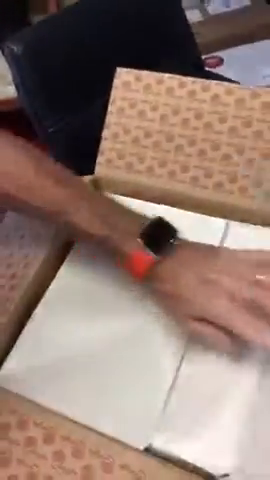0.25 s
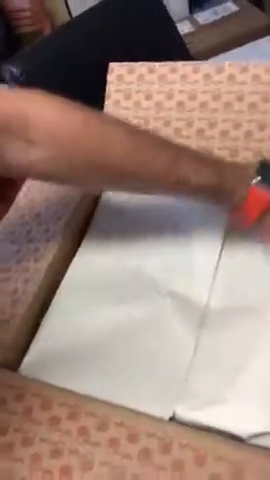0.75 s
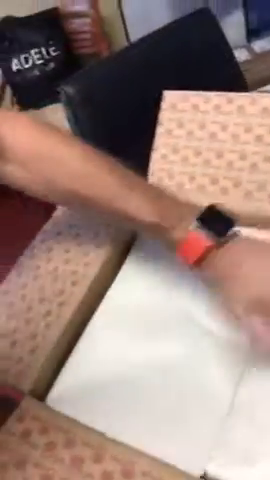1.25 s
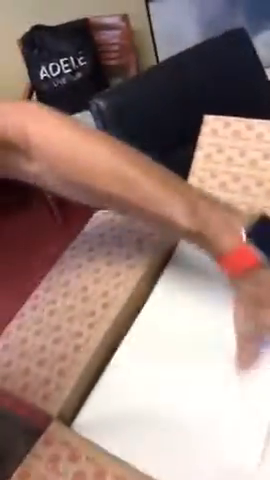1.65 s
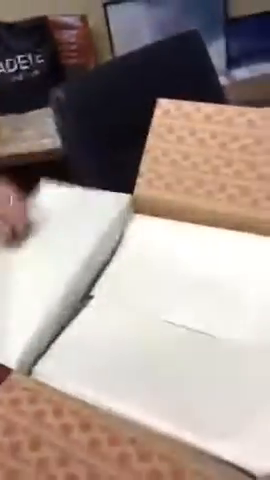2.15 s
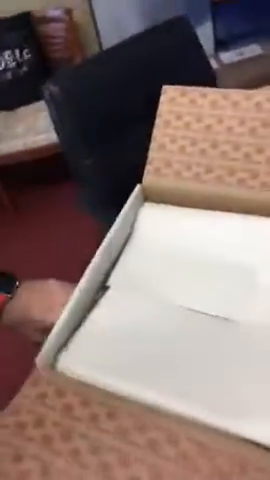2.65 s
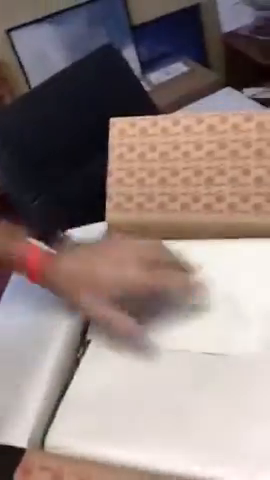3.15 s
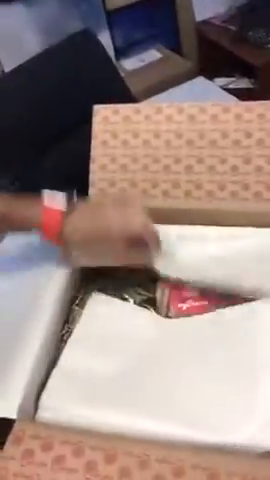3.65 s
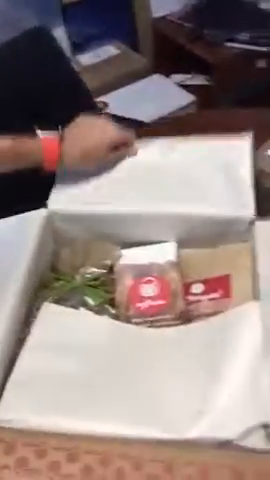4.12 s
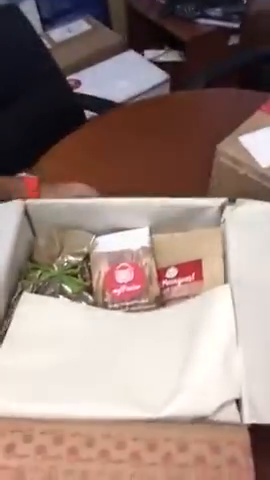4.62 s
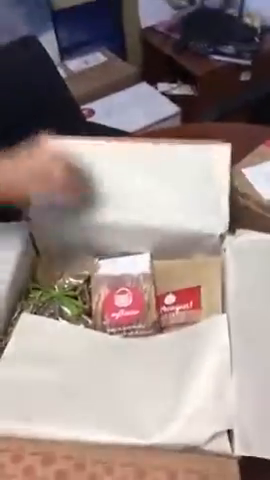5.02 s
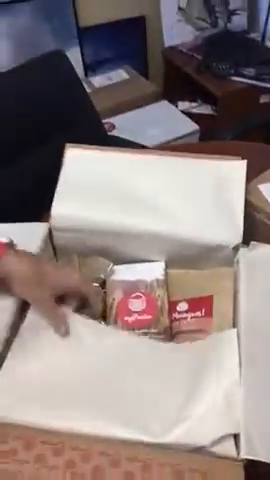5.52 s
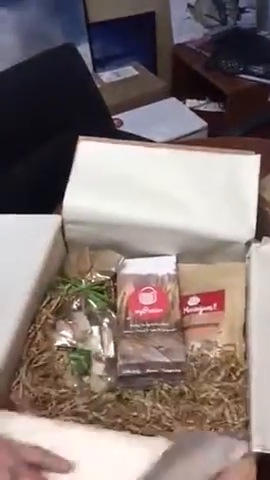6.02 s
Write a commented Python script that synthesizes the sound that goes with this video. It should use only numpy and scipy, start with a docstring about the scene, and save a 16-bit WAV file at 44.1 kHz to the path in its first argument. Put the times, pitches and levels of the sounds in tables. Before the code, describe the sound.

Hands lift and fold back wrapping paper sheets in a box, heard close to the microphone in a small room. Irregular crisp snaps and papery swishes start modestly, calm midway, return stronger with dull cardboard thumps and scrapes, thin out briefly, then end in dense crackling. A faint low ventilation rumble and slight hiss stay underneath.

```python
"""A hand lifts sheets of thin wrapping paper out of a cardboard box and folds them back, in a small quiet room.
Over a low rumble, the first crease snaps after 0.1 s (a noise burst); then the sheet is tugged and slides
(crackling noise) and rubs the box (noise through wall resonances). From 0.55 s the box is also knocked
(a soft push rings its walls). It calms after 2.4 s, is liveliest from 3.3 s, and again from 5.3 s to the end.
Short echoes follow every sound of the paper and the box."""
import sys
import numpy as np
from scipy import signal
from scipy.io import wavfile

SR = 44100
rng = np.random.default_rng(int(sys.argv[2]) if len(sys.argv) > 2 else 0)


def put_to_file(sound):
    """Save the sound as 16-bit audio at rate SR, in the file named by the first command-line argument."""
    columns = np.atleast_2d(sound).T  # one column per channel
    safe = np.clip(columns, -1, 1)
    whole_steps = np.round(safe * 32767)
    wavfile.write(sys.argv[1], SR, whole_steps.astype(np.int16))


def nominal_scale(level):
    """Amplitude ratio for a level in decibels (scalar or array-like)."""
    x = np.asarray(level, float) / 20
    return 10 ** x


N = 276941  # samples, about 6.3 s


def rms_one(x):
    """Scales a sound to an average strength (rms) of 1."""
    return x / np.sqrt(np.mean(x ** 2) + 1e-20)


def level_at(spectrum, hz):
    """Reads a level in dB between the points of a spectrum, along a logarithmic pitch scale."""
    point_hz, point_db = np.array(spectrum)[:, :2].T
    return np.interp(np.log(hz), np.log(point_hz), point_db)


def drift(rate_hz):
    """Slow random wandering: noise through two equal one-pole low-passes at rate_hz; spread 1."""
    pole = np.exp(-40 * np.pi * rate_hz / SR)  # computed at every 20th sample
    noise = rng.standard_normal(N // 20 + 2002)
    slow = signal.lfilter([1], [1, -2 * pole, pole * pole], noise)[2000:]  # skip the run-in
    return np.interp(np.arange(N) / 20, np.arange(len(slow)), rms_one(slow))


def resonance(x, hz, width_hz):
    """Something that rings at one pitch: a two-pole filter with gain 1 at its peak."""
    pole = np.exp(-np.pi * width_hz / SR)
    feed = [(1 - pole * pole) / 2, 0, (pole * pole - 1) / 2]
    return signal.lfilter(feed, [1, -2 * pole * np.cos(2 * np.pi * hz / SR), pole * pole], x)


def bands(spectrum):
    """Splits noise into half-octave bands at the levels of the spectrum; gives centre in Hz and signal."""
    white = rng.standard_normal((2, N))  # neighbouring bands take turns, so they differ
    edges = 25 * 2 ** np.arange(0, 9.6, .5)
    for k, (low, high) in enumerate(zip(edges, edges[1:])):
        hz = np.sqrt(low * high)
        band = signal.butter(2, [low, high], "band", fs=SR, output="sos")
        yield hz, nominal_scale(level_at(spectrum, hz)) * signal.sosfilt(band, white[k % 2])


# Colour of the room's background noise: pitch_hz, level_db (per Hz, relative)
ROOM_COLOUR = [(25, -85), (49, -10), (84, -6.5), (141, 1), (170, -7.5), (354, -17.5), (16000, -38)]


def room_tone():
    """Low ventilation rumble over a faint hiss: noise bands that waver slightly."""
    ROOM_TONE_DB = -61
    wavering = [noise * nominal_scale(0.5 * drift(11.0)) for hz, noise in bands(ROOM_COLOUR)]
    return nominal_scale(ROOM_TONE_DB) * rms_one(sum(wavering))


# Creases buckling: start_s, level_db (peak of the body, before the tick is added), pitch_hz
CREASES = [(.111, -40, 3500), (0.1273, -23, 3560), (0.4338, -27, 1570), (0.4588, -28.5, 3430),
           (0.5533, -18.5, 2800), (0.5645, -22.5, 4000), (0.6865, -32.5, 1630), (0.742, -15.5, 3730),
           (0.7503, -20, 3600), (0.7675, -29, 2280), (0.78, -18.5, 2470), (1.051, -39, 2580),
           (1.4108, -21, 3400), (1.4404, -24, 2170), (1.499, -23.5, 3700), (1.5113, -27, 1120),
           (1.6192, -23, 4200), (1.6657, -28, 4400), (1.7372, -22.5, 2400), (1.745, -24.5, 3540),
           (1.7644, -43, 3330), (1.818, -17.5, 1460), (1.8507, -18, 3325), (1.8796, -24, 4090),
           (2.1404, -22.5, 2540), (2.257, -21.5, 2170), (2.2811, -22.5, 5470), (2.2895, -22.5, 4130),
           (2.384, -25.5, 1940), (3.3566, -15.5, 1710), (3.3594, -17.5, 5550), (3.3774, -17, 2260),
           (3.464, -20, 1130), (3.4823, -23, 4260), (3.506, -24, 3350), (3.5303, -17.5, 5900),
           (3.6545, -20, 1110), (3.682, -19, 2170), (3.715, -19.5, 2000), (3.748, -25, 5500),
           (3.8054, -21.5, 1190), (3.9525, -13.5, 2700), (4.0007, -22.5, 1720), (4.0124, -22, 1840),
           (4.0646, -21, 2230), (4.098, -22.5, 2650), (4.106, -22, 6060), (4.2343, -17.5, 6900),
           (4.3962, -17.5, 1005), (4.979, -20.5, 5900), (5.2686, -25, 4240), (5.295, -17.5, 4000),
           (5.2992, -18.5, 1930), (5.321, -17.5, 1950), (5.3619, -22, 6730), (5.3867, -24.5, 1520),
           (5.4495, -24, 2110), (5.469, -21, 5170), (5.5985, -21, 5000), (5.624, -31, 4000),
           (5.6507, -28, 4080), (5.7296, -25, 2660), (5.7457, -17, 1390), (5.7594, -18, 1950),
           (5.8472, -17, 2500), (5.8598, -10, 3300), (5.865, -13, 2260), (5.9303, -19, 2770),
           (5.947, -21, 2200), (5.9555, -20.5, 2720), (6.007, -16.5, 6630), (6.071, -19, 1580),
           (6.117, -33, 3520), (6.129, -15, 1400), (6.1435, -24, 5500), (6.19, -25.5, 5060),
           (6.253, -32, 4930)]


def snaps():
    """A crease buckles: a sharp burst and short flutter ring its patch of paper, crack broadly and tick."""
    BUCKLE_S, FLUTTER_S, FLUTTER_DB = 0.00047, 0.0033, -9
    out, t = np.zeros(N + 500), np.arange(500) / SR
    treble = signal.butter(2, 6500, "high", fs=SR, output="sos")
    broad = signal.butter(2, [900, 7500], "band", fs=SR, output="sos")
    buckle = np.e * t / BUCKLE_S * np.exp(-t / BUCKLE_S)
    flutter = nominal_scale(FLUTTER_DB) * np.exp(-t / FLUTTER_S) * np.tanh(t / BUCKLE_S)
    for start_s, level_db, hz in CREASES:
        burst = rng.standard_normal(500) * (buckle + flutter)
        ring = rms_one(resonance(burst, hz, .13 * hz))
        crack = rms_one(signal.sosfilt(broad, burst))
        body = ring + .8 * crack
        tick = signal.sosfilt(treble, burst)
        tick_db = -17 + 2.1 * np.log2(hz / 3000)  # small stiff creases ring high and tick brightly
        snap = body / abs(body).max() + nominal_scale(tick_db) * tick / abs(tick).max()
        at = round(start_s * SR)
        out[at:at + 500] += nominal_scale(level_db) * snap
    return out[:N]


def room(x):
    """Sound bounces between walls: ten feedback delays, duller on every round."""
    T60_S, WALL_CUT_HZ = .17, 7000  # time for the bass to fall by 60 dB; walls swallow the treble above the cut
    out, dull = np.zeros(N), np.exp(-2 * np.pi * WALL_CUT_HZ / SR)
    lags = (rng.uniform(0.0048, 0.02, 10) * SR).astype(int)
    for k, lag in enumerate(lags):
        loop, gain, state = x.copy(), nominal_scale(-60 * lag / SR / T60_S), [0.]
        for i in range(lag, N, lag):  # one round of the delay at a time
            back, state = signal.lfilter([gain * (1 - dull)], [1, -dull], loop[i - lag:i], zi=state)
            loop[i:i + lag] += back[:N - i]
        out += (loop - x) * (-1) ** k  # echoes only, with alternating sign
    return out


def movement(t, start_s, length_s, shape):
    """Power of one movement, 1 at its loudest: a rise, an arch over its length, then the paper settles."""
    SETTLE_DB_PER_S = 529
    loudest, start_db, end_db, rise_db_per_s = shape
    share = np.clip((t - start_s) / length_s, 0, 1) - loudest
    bend_db = np.where(share < 0, start_db / loudest ** 2, end_db / (1 - loudest) ** 2)
    rise_db = rise_db_per_s * np.maximum(start_s - t, 0)
    settle_db = SETTLE_DB_PER_S * np.maximum(t - start_s - length_s, 0)
    return nominal_scale(2 * (-bend_db * share ** 2 - rise_db - settle_db))


# The sheet is tugged and gives way at once:
# start_s, length_s, rustle_db, treble_lift_db, rub_db (on the cardboard)
TUG_MOVES = [(.125, 0.0088, -36, -27, -46.5), (.738, 0.067, -32, -5.5, -38.5), (.995, 0.027, -56, -12, -63),
             (1.103, 0.011, -42.5, 14.5, -34), (1.142, 0.012, -55, 1, -48), (1.377, 0.084, -37.5, 1, -41.5),
             (1.6, 0.028, -41.5, 6, -42.5), (1.816, 0.13, -31.5, -1, -52), (1.974, 0.0052, -30.5, 3.5, -56),
             (2.255, 0.033, -41.5, 12, -40), (3.132, 0.042, -57, -4, -51),
             (3.33, 0.099, -29.5, -8.5, -39.5), (3.79, 0.079, -37, -3, -59),
             (4.345, 0.11, -37.5, 10, -38.5), (4.7, 0.036, -52.5, -11.5, -73), (4.853, 0.047, -45, 12, -36),
             (5.265, 0.052, -41.5, 11.5, -42), (5.355, 0.13, -50.5, 10, -49.5),
             (5.845, 0.027, -29, 4.5, -51), (6.066, 0.014, -34, -7, -40.5)]
# The sheet slides, swelling and fading with the hand: start_s, length_s, rustle_db, treble_lift_db
SLIDE_MOVES = [(0.172, 0.12, -47, -9), (0.302, 0.13, -62.5, -3), (0.421, 0.2, -41, 5), (.6, 0.25, -54.5, 7),
               (0.852, 0.13, -61.5, -1), (1.022, 0.081, -56.5, 6.5), (1.453, 0.33, -45, -3.5),
               (1.637, 0.041, -42, -5), (1.7, 0.099, -46, 0), (1.912, 0.18, -40, 2),
               (2.067, 0.11, -39.5, 8), (2.152, 0.11, -40.5, -2.5), (2.308, 0.14, -44, 0),
               (2.646, 0.12, -62, -4), (2.958, 0.17, -50.5, 4), (3.223, 0.064, -54, -17),
               (3.421, 0.14, -33, -5), (3.564, 0.14, -37.5, 3), (3.664, 0.12, -31, -1),
               (3.857, 0.19, -40.5, 11), (4.025, 0.13, -38, 9.5), (4.13, 0.22, -47, 7),
               (4.825, 0.059, -52, 3), (4.896, 0.11, -45.5, 5.5), (5.406, 0.076, -38, -2),
               (5.507, 0.053, -42.5, -6.5), (5.59, 0.2, -47.5, 4.5), (5.708, 0.083, -29.5, -14.5),
               (5.767, 0.07, -31.5, -11), (5.91, 0.076, -34.5, -0.5), (5.967, 0.096, -45, -1),
               (6.104, 0.058, -33, -1), (6.163, 0.057, -49.5, 5), (6.244, 0.039, -53, 5)]
# A hand or flap rubs the box itself: start_s, length_s, deep_db, high_db (deep and high wall resonances)
BOX_RUBS = [(0.526, 0.14, -44.5, -40.5), (1.108, 0.025, -64, -40), (2.376, 0.067, -41.5, -50),
            (2.64, 0.13, -56, -49.5), (3.144, 0.021, -61, -47), (3.231, 0.04, -53, -44.5),
            (4.033, 0.16, -41.5, -46), (4.29, 0.058, -45, -39), (4.344, 0.12, -37, -35.5)]


def handling():
    """Adds all movements in power: rustle dB, treble lift dB (louder movements weigh more), two rub dB."""
    # loudest at this share of the length, dB lower at start, dB lower at end, rise before the start in dB/s
    TUG_SHAPE, SLIDE_SHAPE = (.3, 5.0, 8.0, 5000.0), (0.57, 8.65, 10.5, 640)
    SLIDE_RUB_DB = -13  # a sliding sheet rubs the cardboard this much below its rustle
    t = np.arange(0, N + 64, 64) / SR
    paper, treble, deep, high = 1e-10, 0, 1e-10, 1e-10  # near-silent floor
    slides = [(*row, row[2] + SLIDE_RUB_DB) for row in SLIDE_MOVES]
    for rows, shape in ((TUG_MOVES, TUG_SHAPE), (slides, SLIDE_SHAPE)):
        for start_s, length_s, rustle_db, treble_db, rub_db in rows:
            power = movement(t, start_s, length_s, shape)
            rustle_power = power * nominal_scale(2 * rustle_db)
            rub_power = power * nominal_scale(2 * rub_db)
            paper = paper + rustle_power
            treble = treble + rustle_power * treble_db
            deep, high = deep + rub_power, high + rub_power
    for start_s, length_s, deep_db, high_db in BOX_RUBS:
        power = movement(t, start_s, length_s, SLIDE_SHAPE)
        deep, high = deep + power * nominal_scale(2 * deep_db), high + power * nominal_scale(2 * high_db)
    controls = 10 * np.log10(paper), treble / paper, 10 * np.log10(deep), 10 * np.log10(high)
    return [np.interp(np.arange(N) / SR, t, control) for control in controls]


def grains(per_s, spread_db, decay_s):
    """Power envelope of tiny buckles that come in clumps, each dying fast; mean 1."""
    born = rng.random(N) < per_s * nominal_scale(4 * drift(25)) / SR
    power = born * nominal_scale(2 * spread_db * np.minimum(rng.exponential(1, N), 2.5))
    power = signal.lfilter([1], [1, -np.exp(-1 / (decay_s * SR))], power + 1e-18)
    return power / power.mean()


# Colour of the sliding paper: pitch_hz, level_db (per Hz, relative)
PAPER_COLOUR = [(470, -14), (800, -7.5), (3220, -3.5), (6090, -8.5), (10400, -17.5), (13400, -1.5),
                (16000, -25.5)]


def rustle(level_db, treble_db):
    """Broad buckles gate a sliding hiss in all bands at once; small ones each ring one patch of paper."""
    broad = grains(170, spread_db=3.6, decay_s=.002)
    out, scale = 0, 0
    for hz, noise in bands(PAPER_COLOUR):
        rings = 0
        if hz > 500:
            for patch_hz in hz * 2 ** rng.uniform(-.25, .25, 2):
                tick = np.sqrt(grains(45, spread_db=-1.5, decay_s=0.0013)) * rng.standard_normal(N)
                rings = rings + resonance(tick, min(patch_hz, 17000), 0.13 * patch_hz)
            rings = rms_one(rings)
        hiss = noise * np.sqrt(.16 + .55 * broad)
        crackle = .5 * noise.std() * rings
        tilt_db = np.clip(np.log2(hz / 1800) / 3.36, 0, 1) * treble_db  # the lift grows above 1800 Hz
        out = out + (hiss + crackle) * nominal_scale(tilt_db + 2.5 * drift(13))
        scale += np.mean(noise ** 2)
    return out / np.sqrt(scale) * nominal_scale(level_db)


# Resonances of the box walls: pitch_hz, width_hz (basic; each use widens it), level_db (relative)
BOX_WALLS = [(210, 15.6, -11.5), (443, 116, -5.5), (315, 96, 4), (673, 97, -3), (882, 140, 2.5),
             (1586, 113, -1.5), (2200, 78, -8)]


def cardboard(deep_db, high_db):
    """A rough rub drives the resonances of the box walls, each wavering in level."""
    DEEP_BELOW_HZ = 500
    rub = rng.standard_normal(N) * np.sqrt(.5 + .5 * grains(250, spread_db=3.0, decay_s=.003))
    body, steady = 0, 0
    for hz, width_hz, db in BOX_WALLS:
        ring = resonance(resonance(rub, hz, 1.9 * width_hz), hz, 1.9 * width_hz)
        wall = nominal_scale(db + 0.99 * drift(7.7)) * ring / np.sqrt(width_hz)
        body = body + wall * nominal_scale(deep_db if hz < DEEP_BELOW_HZ else high_db)
        steady = steady + wall
    return body / np.std(steady)


# The box is bumped: start_s, level_db (peak), pitch_hz (of the wall that is hit)
BUMPS = [(0.553, -36, 362), (0.569, -38.5, 80), (0.565, -29, 940), (1, -41, 960), (1.126, -29.5, 925),
         (2.259, -29.5, 463), (2.263, -26, 210), (3.136, -30.5, 1480), (3.243, -39, 980), (4.033, -24, 368),
         (4.209, -30.5, 210), (4.218, -28.5, 312), (4.259, -31, 323), (4.357, -19, 870), (4.419, -24, 1050),
         (4.863, -23.5, 910), (6.071, -24.5, 331), (6.085, -33.5, 108)]


def knocks():
    """A soft push rings the wall that was hit, and faintly the whole box, most the modes near it."""
    out, t = np.zeros(N + 6000), np.arange(6000) / SR
    push = np.exp(-t / 0.00059) * t / .0007
    whole_box = rms_one(resonance(push, 81.5, 37))
    for start_s, level_db, hz in BUMPS:
        luck_db = rng.normal(0, 1, len(BOX_WALLS) + 1)
        ring = rms_one(resonance(push, hz, 0.072 * hz))
        ring += nominal_scale(-6.5 + luck_db[-1]) * min(1, 300 / hz) * whole_box
        for (wall_hz, width_hz, wall_db), luck in zip(BOX_WALLS, luck_db):
            octaves_away = abs(np.log2(wall_hz / hz))
            mode = rms_one(resonance(push, wall_hz, 2.1 * width_hz))
            ring += nominal_scale(wall_db - 10.5 + luck - 3.0 * octaves_away) * mode
        at = round(start_s * SR)
        out[at:at + 6000] += nominal_scale(level_db) * ring / abs(ring).max()
    return out[:N]


def scene():
    """Paper and box close by, their echoes, and the room tone, as one channel."""
    ECHO_DB = -22
    level_db, treble_db, deep_db, high_db = handling()
    near = rustle(level_db, treble_db) + cardboard(deep_db, high_db) + snaps() + knocks()
    return (near + nominal_scale(ECHO_DB) * room(near) + room_tone())[None]


def roll_off(x):
    """The treble ends steeply here."""
    return signal.sosfilt(signal.butter(12, 16850, fs=SR, output="sos"), x)


def record(dry):
    """The microphone drops the deepest bass, its housing dips two bands, and the top treble is cut."""
    heard = dry - .5 * resonance(dry, 4950, 430) - 0.34 * resonance(dry, 10300, 2500)
    bass_cut = signal.butter(2, 45, "high", fs=SR, output="sos")
    treble_cut = signal.cheby2(12, 60, 16300, fs=SR, output="sos")  # 60 dB down from 16300 Hz up
    mix = signal.sosfilt(treble_cut, signal.sosfilt(bass_cut, heard))
    return roll_off(mix)


dry = scene()
out = record(dry)
put_to_file(out)
```